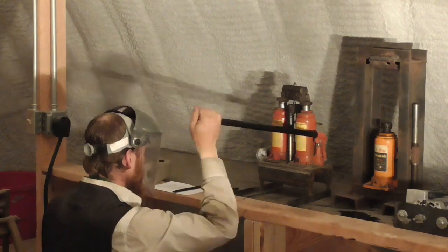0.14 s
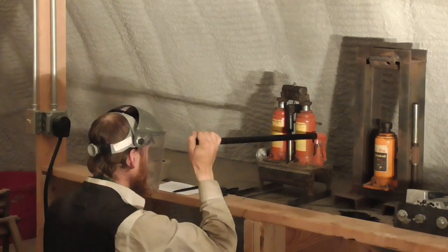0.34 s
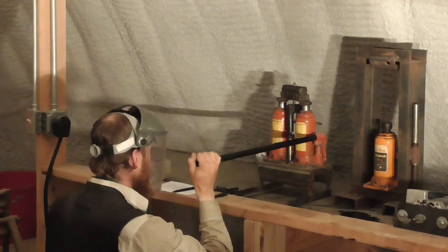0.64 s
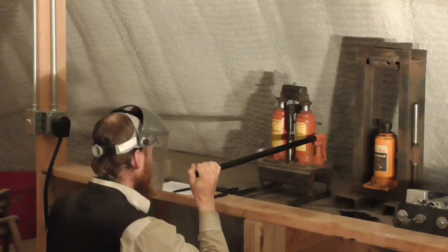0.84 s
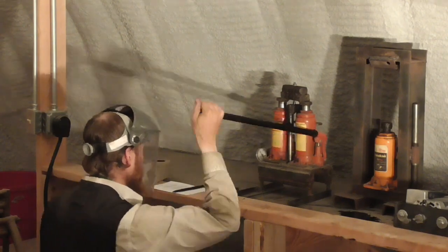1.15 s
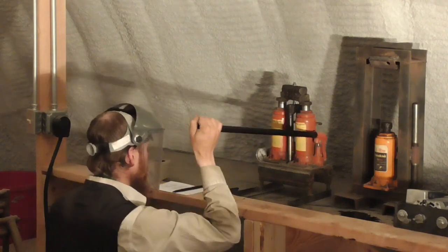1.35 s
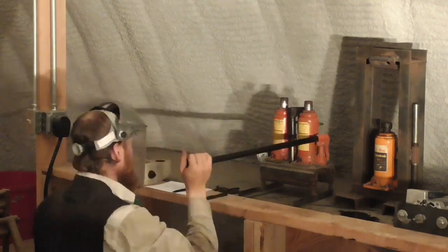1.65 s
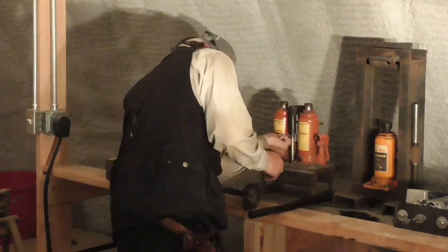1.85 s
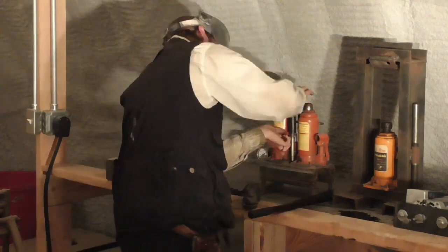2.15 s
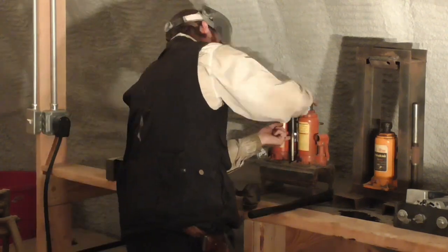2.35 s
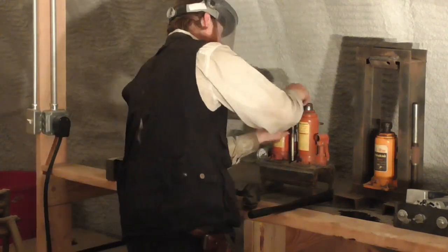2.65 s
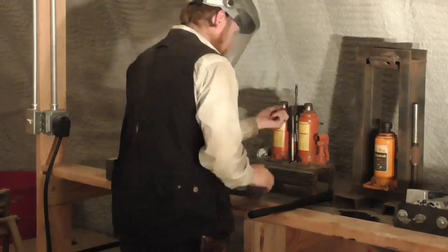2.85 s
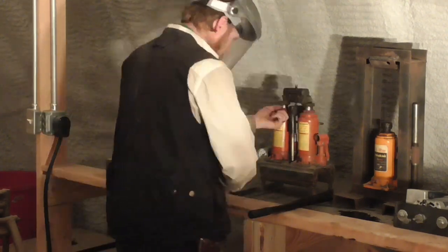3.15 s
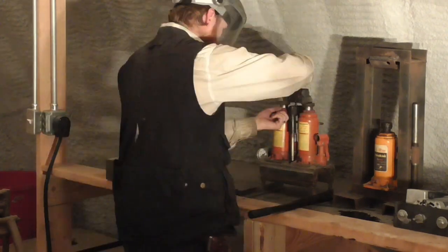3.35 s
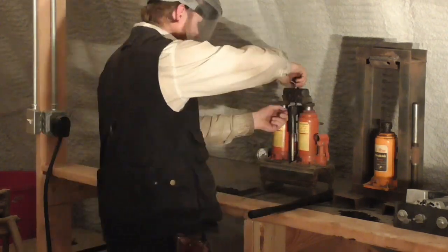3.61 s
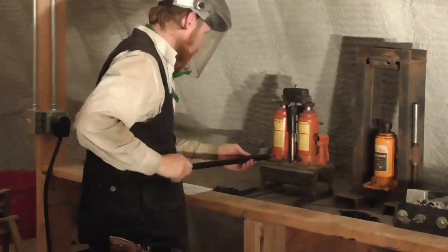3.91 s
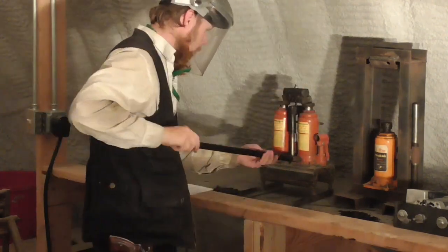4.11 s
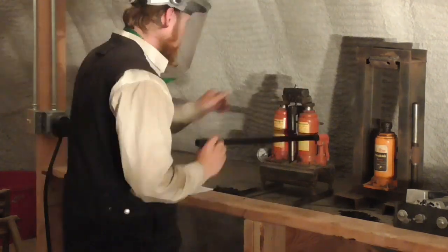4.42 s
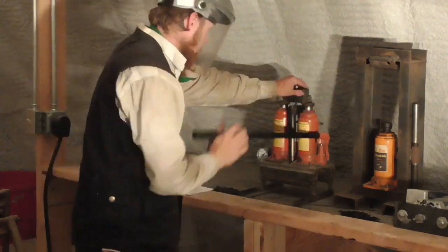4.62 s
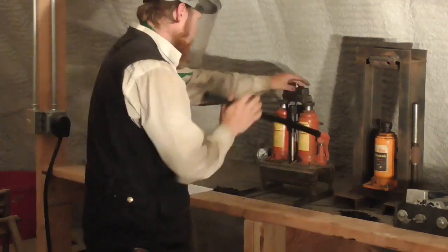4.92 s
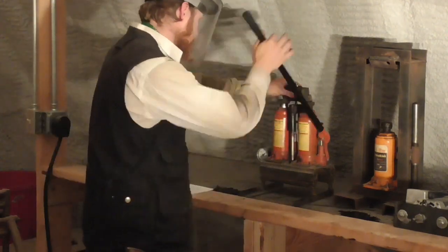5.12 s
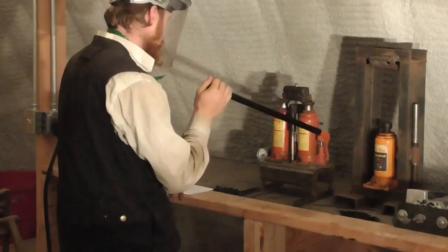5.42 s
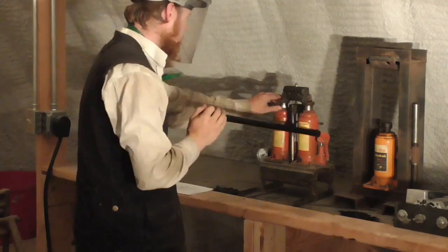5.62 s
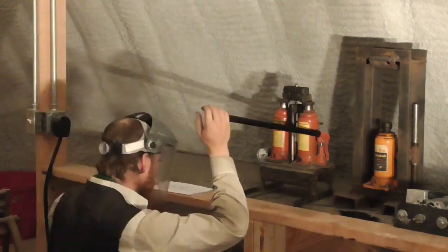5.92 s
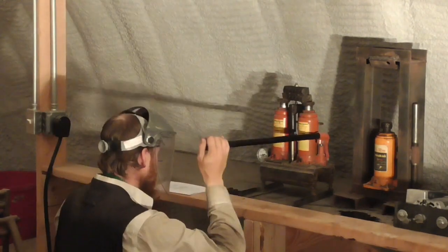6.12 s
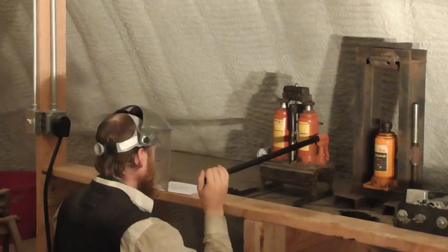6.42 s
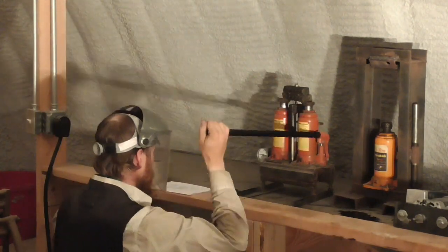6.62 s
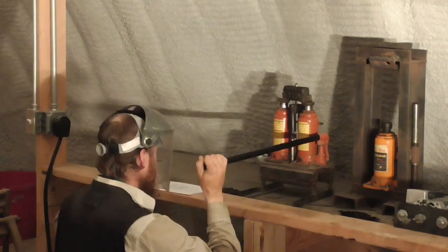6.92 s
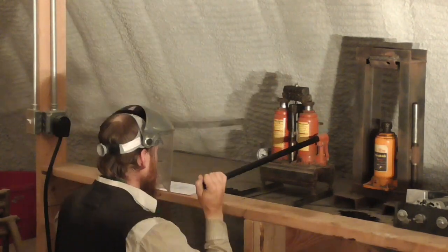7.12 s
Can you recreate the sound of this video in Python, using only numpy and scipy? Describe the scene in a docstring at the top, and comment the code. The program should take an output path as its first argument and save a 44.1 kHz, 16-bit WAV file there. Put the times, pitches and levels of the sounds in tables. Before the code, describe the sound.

A steady, bright hiss fills the whole 7.5 seconds, with a thin, high whine wavering slightly and a barely audible hum; the sound is mono, thin and bassless, in a shed workshop. A hand-pumped bottle jack ticks faintly at 0.1 and around 1.05 s. At about 1.53 s the steel handle falls on the bench: a hard, bright metallic clatter in two quick bursts, the second stronger from 1.62 s, gone by 1.8 s. This is by far the loudest event. Small clicks and clinks follow at 2.45-3.0 s, the clearest at 3.0. Around 3.8-4.2 s the handle is picked up and fitted with light steely knocks and taps. Soft knocks come at 4.5-5.0 s, with a faint loose jiggle at 5.0-5.4 s, then a duller cluster at 5.7-5.9 s. Pumping resumes nearly inaudibly, with faint ticks at 6.45 and 7.2 s under the hiss.

```python
"""A broad hiss carries a high wavering whine and a faint hum; over it a hand-pumped bottle jack works
on a wooden bench in a shed, thin and in mono: the linkage ticks, the steel handle knocks the bench
and once clatters down in two bursts. Hiss is shaped noise, whine and hum are sines, and contacts are
spiky noise and clicks ringing the resonances of jack, base plate and steel handle."""
import sys
import numpy as np
from scipy import signal
from scipy.fft import rfft, irfft
from scipy.io import wavfile

SR = 44100
rng = np.random.default_rng(int(sys.argv[2]) if len(sys.argv) > 2 else 0)


def file_out(sig):
    """Save sig as 16-bit WAV at sys.argv[1]."""
    # one column per channel
    cols = np.atleast_2d(sig).T
    # limit, then scale
    lim = np.clip(cols, -1, 1)
    pcm = np.round(lim * 32767).astype(np.int16)
    wavfile.write(sys.argv[1], SR, pcm)


N = 320166   # samples

# resonances of the jack: mode_hz, width_hz, level_db (relative)
JACK_MODES = [(1911, 30, -7), (2075, 20, -3), (2125, 18, 1), (2358, 30, -6), (2402, 30, -6), (2753, 40, -5),
              (3257, 40, -8), (3450, 80, -7), (3585, 40, -5), (3727, 30, -6), (4077, 30, -2)]
# resonances of the base plate: mode_hz, width_hz, level_db (relative)
PLATE_MODES = [(820, 50, -11), (981, 28, -5), (1016, 28, 0), (1220, 60, -6), (1400, 60, -6)]
# resonances of the steel handle: mode_hz, width_hz, level_db (relative)
STEEL_MODES = [(5040, 150, -3), (5620, 60, 0), (5920, 40, -1), (6469, 90, -1), (7660, 65, -3),
               (8387, 80, -2), (9000, 300, -4), (12200, 900, -5), (13800, 1200, -5), (15200, 1000, -5)]


def amp(db):
    """Decibels to amplitude."""
    return 10 ** (np.asarray(db) / 20)


def rms_one(x):
    """Scale to rms 1."""
    return x / np.sqrt(np.mean(x ** 2) + 1e-20)


def drift(rate_hz):
    """Slow chance: noise through a double one-pole low-pass, spread 1."""
    r = np.exp(-2 * np.pi * rate_hz / SR)
    noise = rng.standard_normal(N + SR)
    settled = signal.lfilter([1], [1, -2 * r, r * r], noise)[SR:]
    return rms_one(settled)


def resonance(x, hz, width_hz):
    """Two-pole resonance with gain 1 on top."""
    r = np.exp(-np.pi * width_hz / SR)
    numerator = [1 - r * r, 0, r * r - 1]
    denominator = [2, -4 * r * np.cos(2 * np.pi * hz / SR), 2 * r * r]
    return signal.lfilter(numerator, denominator, x)


def double_resonance(x, hz, width_hz):
    """The same resonance twice: steeper skirts."""
    return resonance(resonance(x, hz, width_hz), hz, width_hz)


def body(x, modes, low_hz, high_hz, broad_db):
    """A struck part: its clear modes over a broad band of many small ones; rms gain 1 for white noise."""
    band = signal.butter(2, [low_hz, min(high_hz, .45 * SR)], "band", fs=SR, output="sos")

    def ring(v):
        """Modes of alternating sign plus the broad band."""
        clear = sum((-1) ** k * amp(db) * resonance(v, hz, width_hz)
                    for k, (hz, width_hz, db) in enumerate(modes))
        return clear + amp(broad_db) * signal.sosfilt(band, v)

    impulse = np.full(SR // 2, 1e-18)   # tiny offset avoids denormals
    impulse[0] = 1
    return ring(x + 1e-18) / np.linalg.norm(ring(impulse))


def rattle(spiky_db):
    """Dense uneven contacts: noise with occasional sharp spikes, rms 1."""
    spikes = np.minimum(rng.exponential(1, N), 5)
    return rms_one(rng.standard_normal(N) * amp(spiky_db * spikes))


def low_thud(x, cutoff_hz):
    """Dull contact sound: first-order low-pass."""
    return signal.sosfilt(signal.butter(1, cutoff_hz, fs=SR, output="sos"), x)


def dying(start_s, level_db, t60_s):
    """Sample range of a contact and its force: 0.5 ms rise, exponential decay, cut after 1/3 s."""
    i = round(start_s * SR)
    age_s = np.arange(min(SR // 3, N - i)) / SR
    decay = amp(level_db - 60 * age_s / max(t60_s, .01))
    return slice(i, i + len(age_s)), np.minimum(age_s / .0005, 1) * decay


def hiss():
    """Coloured noise that flickers slightly, with narrow humps."""
    # spectrum of the broad hiss: point_hz, density_db (per Hz, relative)
    spectrum = [(30, -55), (415, -44), (760, -41), (1190, -29), (2050, -14.5), (2540, -16), (4250, -7),
                (5300, -10.5), (6720, -13), (8300, -10.5), (9710, -13.5), (12300, -15), (13400, -21.5),
                (14600, -16.5), (15100, -24.5), (16000, -21.5)]
    # narrow bands that stand out: hump_hz, width_hz, rms_db
    hump_bands = [(1930, 25, -73), (2078, 20, -72), (3590, 30, -68), (3853, 25, -66), (4030, 80, -64),
                  (4226, 30, -60), (4330, 25, -66), (4510, 25, -64), (4712, 25, -66), (5045, 25, -65),
                  (5441, 25, -68), (7037, 20, -69)]
    broad_rms_db, flicker_db = -47, .5

    bin_hz = np.maximum(np.arange(N // 2 + 1) * SR / N, 1)
    point_hz, density_db = np.transpose(spectrum)
    colour = amp(np.interp(np.log(bin_hz), np.log(point_hz), density_db))
    broad = irfft(rfft(rng.standard_normal(N)) * colour, N)
    white = rng.standard_normal(N)
    humps = sum(amp(db) * rms_one(double_resonance(white, hz, width_hz))
                for hz, width_hz, db in hump_bands)
    return amp(broad_rms_db + flicker_db * drift(24.0)) * rms_one(broad) + humps


def tones():
    """Harmonics of a whine wavering in pitch and level, and a hum of fixed pitch and steadier level."""
    # whine partials: multiple, rms_db
    whine_partials = [(1, -63), (2, -61.5), (3, -50), (4, -69.5)]
    # hum partials: partial_hz, rms_db
    hum_partials = [(608, -92), (1217, -79.5)]
    whine_hz, waver_hz = 3078.4, 1.02

    phase = 2 * np.pi * np.cumsum(whine_hz + waver_hz * drift(4.0)) / SR
    whine = sum(amp(db + 1.4 * drift(15.0)) * np.sin(k * phase) for k, db in whine_partials)
    t = np.arange(N) / SR
    hum = sum(amp(db + 0.74 * drift(3.0)) * np.sin(2 * np.pi * hz * t) for hz, db in hum_partials)
    return np.sqrt(2) * (whine + hum)   # sine rms to peak


def knocks():
    """Ticks, knocks, taps and jiggle: decaying noise and clicks ring the jack, plate and steel, with a thud."""
    # pump linkage ticks on one narrow note: start_s, level_db, centre_hz
    tick_table = [(0.116, -48.5, 2190), (1.046, -57.5, 2040), (1.086, -53, 2340), (1.564, -27, 2090),
                  (2.744, -43.5, 2750), (4.115, -58, 2360), (5.245, -52.5, 2210), (5.379, -59, 2280),
                  (6.454, -48.5, 2230), (7.2, -55.5, 2260)]
    # handle knocks jack and bench: start_s, level_db, centre_hz, plate_db, steel_db, click_db
    # (these three relative to level_db), t60_s
    knock_table = [(1.5312, -37, 4000, -9, 5.5, 0, .025), (1.637, -22, 2380, -18, -24, -6, 0.074),
                   (1.65, -26, 3260, -31, 0, -12, 0.032), (1.798, -36.5, 3300, -15, -10, -7, 0.057),
                   (2.448, -49.5, 2720, -25, 3, -2, 0.25), (2.657, -58, 1930, -4, 8, 0, 0.15),
                   (2.707, -46, 2940, -22, 3, -8, 0.24), (2.989, -45, 2800, -16, 2.5, 0, 0.13),
                   (3.005, -37, 2680, -12.5, -16, 4, 0.13), (3.818, -54, 1670, -28, 3, 2, 0.1),
                   (3.942, -55, 2470, -8, 4, 0, 0.8), (4.030, -42.5, 3020, -17, 8.5, 2, 0.1),
                   (4.066, -47, 2700, -20, 2.5, -12, 0.27), (4.096, -45.5, 3100, -20, 6, -12, 0.11),
                   (4.5, -47, 2580, -14, -15, 3, 0.15), (4.673, -53, 2050, -22, -18, 12, 0.17),
                   (4.975, -40.5, 2980, -27, -22, -3, .08), (5.029, -47, 2230, -7, -14, -7, 0.18),
                   (5.713, -47, 2500, -14, -20, -5, 0.12), (5.776, -43.5, 1270, -14, -23, 11.5, .14),
                   (5.887, -49.5, 2220, -2, -27, 0, 0.14), (5.896, -42.5, 1120, -10, -30, 6, 0.069),
                   (5.909, -53, 1260, -24, -18, -2, 0.23)]
    # light taps on the base plate, with a thud: start_s, level_db
    tap_table = [(0.188, -61), (2.863, -59), (3.33, -66), (3.977, -61), (4.189, -66), (4.266, -62),
                 (4.438, -68), (4.859, -59)]
    # loose handle jiggling on the base plate: time_s, level_db
    jiggle_table = [(0, -95), (2.8, -82), (3.8, -84.5), (4.0, -76), (4.3, -85.5), (5.0, -70.5), (5.35, -72),
                    (5.5, -88), (7.26, -85)]
    tick_width, knock_width = 0.13, 0.88   # shares of the centre
    tick_plate_db, tick_steel_db, tick_click_db, tick_t60_s = -15.5, -3.5, 0, 0.12
    tap_t60_s, thud_db, tap_thud_db = 0.062, -26, -7
    click_pitch, click_width = 1.83, 1.6   # shares of the centre
    click_s = 0.0014   # duration at contact level whose energy one click sample carries

    rows = [(s, db, hz, tick_width * hz, tick_plate_db, tick_steel_db, tick_click_db, tick_t60_s)
            for s, db, hz in tick_table]
    rows += [(s, db, hz, knock_width * hz, *rest) for s, db, hz, *rest in knock_table]
    grit = rattle(spiky_db=0.59)
    direct, steel_clicks = np.zeros(N), np.zeros(N)
    plate_force, steel_force, thud_force = np.zeros(N), np.zeros(N), np.zeros(N)
    for start_s, db, hz, width_hz, plate_db, steel_db, click_db, t60_s in rows:
        at, shape = dying(start_s, db, t60_s)
        even = np.sqrt(2 * SR / (np.pi * width_hz))   # undoes the power lost outside the band
        direct[at] += even * double_resonance(shape * grit[at], hz, width_hz)
        click = np.full(len(shape), 1e-18)
        click[0] += amp(db + click_db) * np.sqrt(click_s * SR)
        direct[at] += 1.9 * double_resonance(click, click_pitch * hz, click_width * hz)
        steel_clicks[at] += amp(steel_db - 9) * click
        plate_force[at] += shape * amp(plate_db)
        steel_force[at] += shape * amp(steel_db)
        thud_force[at] += shape * amp(thud_db)
    for start_s, db in tap_table:
        at, shape = dying(start_s, db, tap_t60_s)
        plate_force[at] += shape
        thud_force[at] += shape * amp(tap_thud_db)

    # small parts give no bass
    direct = signal.sosfilt(signal.butter(8, 1020, "high", fs=SR, output="sos"), direct)
    time_s, jiggle_db = np.transpose(jiggle_table)
    plate_force += amp(np.interp(np.arange(N) / SR, time_s, jiggle_db) + 4.5 * drift(12.0))

    jack = amp(-7.5) * body(direct, JACK_MODES, 1900, 4800, broad_db=-55)
    plate = body(plate_force * rattle(spiky_db=0.74), PLATE_MODES, 1000, 2300, broad_db=-15)
    steel_drive = steel_force * rattle(spiky_db=0.93) + steel_clicks
    steel = body(steel_drive, STEEL_MODES, 4500, 9400, broad_db=6)
    thud = low_thud(thud_force * rattle(spiky_db=1.0), 400)
    return direct + jack + plate + steel + thud


def clatter():
    """The handle falls in two bursts of dense contacts that ring the jack, base plate and steel."""
    # bursts: start_s, first_db, loudest_s, loudest_db, lift_off_s, treble_db (relative, at the start)
    burst_table = [(1.5296, -39, 1.568, -23, 1.610, 1.5), (1.619, -24.5, 1.65, -20, 1.795, -0.5)]
    fade_db_per_s, fade_bend_db_per_s2 = 85, 900   # after the loudest moment, ever faster
    lift_db_per_s = 3500   # contacts stop almost at once when the handle lifts off
    treble_loss_db_per_s, plate_db = 59, -17.5

    t = np.arange(N) / SR
    jack_force, steel_force = np.zeros(N), np.zeros(N)
    for start_s, first_db, loudest_s, loudest_db, lift_off_s, treble_db in burst_table:
        late_s = np.maximum(t - loudest_s, 0)
        db = np.interp(t, [start_s, loudest_s], [first_db, loudest_db])
        db -= fade_db_per_s * late_s + fade_bend_db_per_s2 * late_s ** 2
        db -= lift_db_per_s * np.maximum(t - lift_off_s, 0)
        jack_force += (t > start_s) * amp(db)
        steel_force += (t > start_s) * amp(db + treble_db - treble_loss_db_per_s * (t - start_s))
    clumps = amp(1.5 * drift(200.0))   # strikes come in small clumps
    jack_force, steel_force = clumps * jack_force, clumps * steel_force
    plate_force = amp(plate_db) * jack_force

    thud = amp(-12.0) * low_thud(plate_force * rattle(spiky_db=1.0), 300)
    jack = body(jack_force * rattle(spiky_db=3.1), JACK_MODES, 1970, 5160, broad_db=-2.5)
    plate = body(plate_force * rattle(spiky_db=2.0), PLATE_MODES, 1340, 2600, broad_db=-13)
    steel = body(steel_force * rattle(spiky_db=2.6), STEEL_MODES, 5400, 8600, broad_db=2.5)
    dip = 1 - .85 * np.exp(-((t - 1.618) / 0.002) ** 2)   # the clatter dips briefly between the bursts
    return dip * (jack + plate + steel + thud)


def scene():
    """Sum of all sources, the same in both channels."""
    mono = hiss() + tones() + knocks() + clatter()
    return np.tile(mono, (2, 1))


def record(dry):
    """Steep elliptic low-pass cuts the top."""
    cutoff_hz, ripple_db, stop_db = 15750, .5, 70
    return signal.sosfilt(signal.ellip(14, ripple_db, stop_db, cutoff_hz, fs=SR, output="sos"), dry)


dry = scene()
out = record(dry)
file_out(out)
```